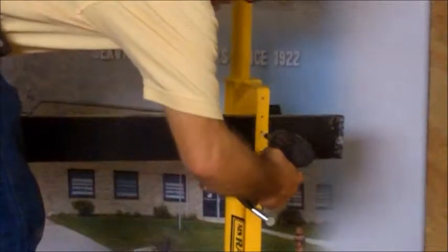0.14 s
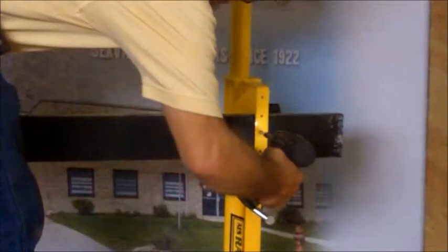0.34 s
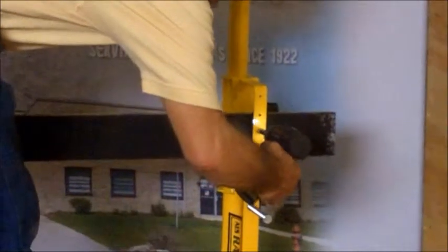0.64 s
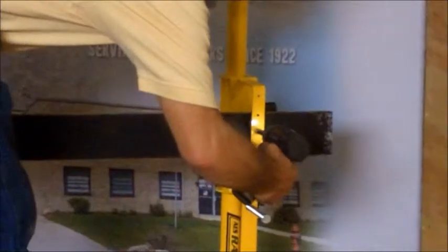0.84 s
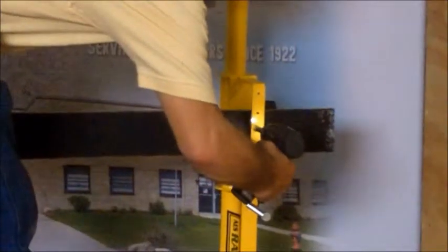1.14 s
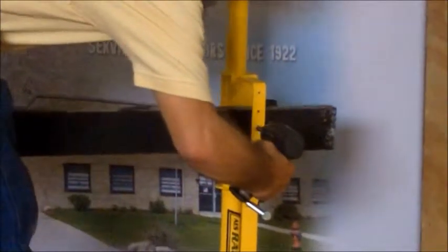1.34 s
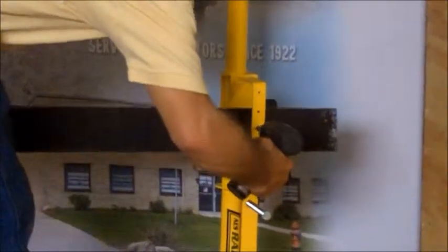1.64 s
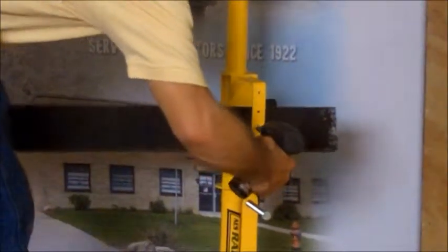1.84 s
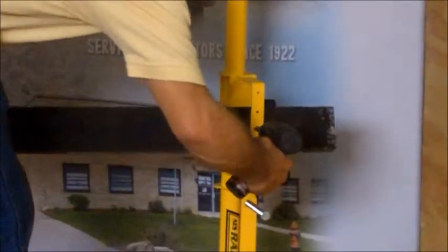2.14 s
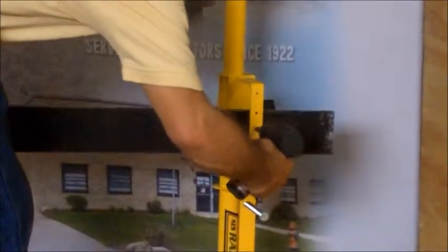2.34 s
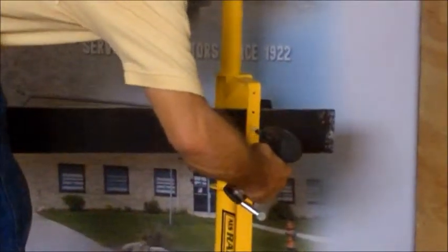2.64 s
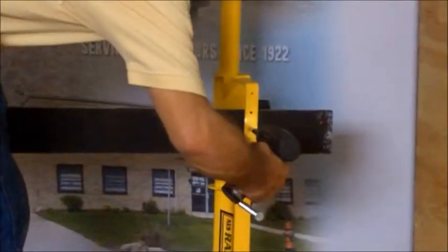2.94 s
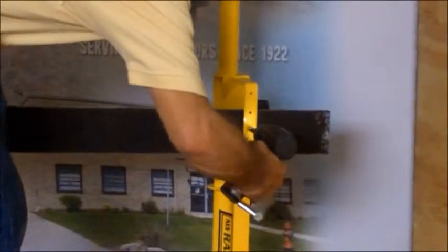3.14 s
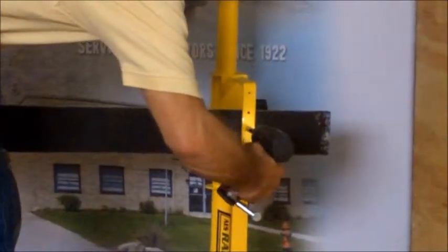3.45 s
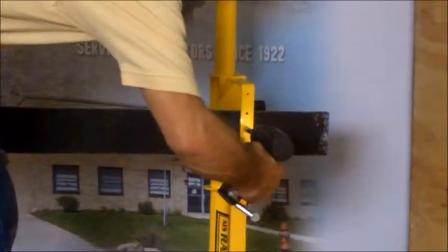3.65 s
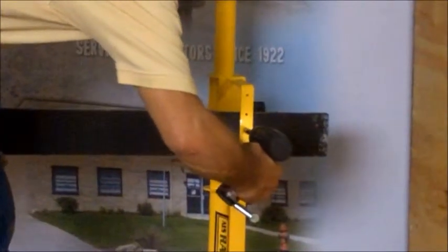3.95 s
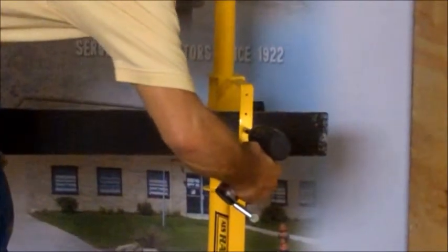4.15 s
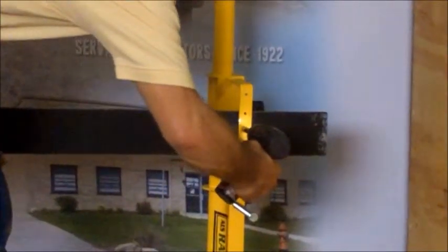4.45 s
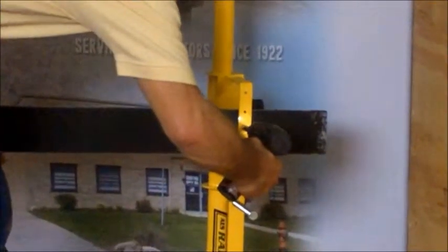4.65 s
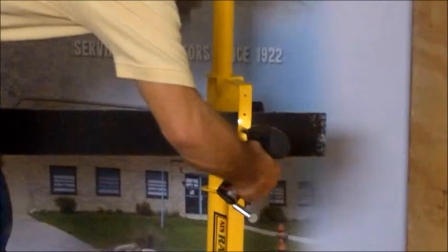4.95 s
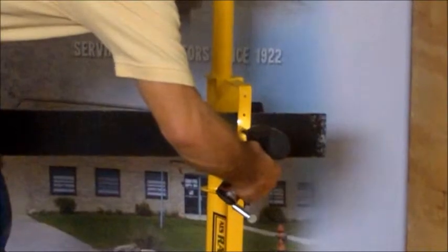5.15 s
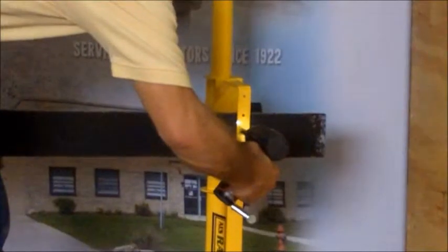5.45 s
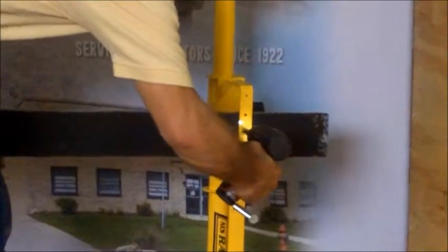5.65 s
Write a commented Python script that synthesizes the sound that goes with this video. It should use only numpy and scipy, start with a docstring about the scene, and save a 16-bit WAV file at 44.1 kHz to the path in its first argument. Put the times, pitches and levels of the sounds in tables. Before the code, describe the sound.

A cordless impact driver works close by in a workshop with a low hush and a short echo. At about 0.4 seconds its motor whirs up to a steady whine, and at 0.6 the bit clacks sharply several times as it seats. The screw groans faintly in the wood around 0.9 seconds. At 1.4 the motor coasts down. Until about 3 seconds, a steel post shifts against a rail and a large board, with soft knocks, scrapes and two short creaks. At 3 seconds the motor spins up again, then sags under load. At 3.3 a metallic clank opens loud, rapid hammering, quickening to about forty blows a second. The blows make the post ring and the board thud lightly. The ringing eases a little while the sharp clicks stand out more, continuing to the end near 5.8 seconds.

```python
"""A cordless impact driver fixes a steel post to a rail on a large board, close by in a workshop.
First the motor whirs up and runs a screw in: the bit clacks as it seats, the screw groans in the wood.
The motor coasts to a stop at 1.4 s, and the post shifts, knocking and scraping on the rail and board.
At 3 s a second pull begins: the motor sags under load and the hammer starts. To the end,
its blows, quickening to about forty a second, click sharply and make the post ring."""
import sys
import numpy as np
from scipy import signal
from scipy.fft import rfft, irfft
from scipy.io import wavfile
from scipy.ndimage import uniform_filter1d

SR = 44100
rng = np.random.default_rng(int(sys.argv[2]) if len(sys.argv) > 2 else 0)


def dump(signal):
    """Clip the signal to [-1, 1] and save it as 16-bit WAV at the path in sys.argv[1]."""
    limited = np.clip(np.atleast_2d(signal).T, -1, 1)
    pcm = np.round(limited * 32767).astype(np.int16)
    wavfile.write(sys.argv[1], SR, pcm)


N = 255383
T = np.arange(N) / SR
HZ = np.fft.rfftfreq(8192, 1 / SR)


def amp(db):
    return 10 ** (np.asarray(db) / 20)


def unit_rms(x):
    return x / np.sqrt(np.mean(x ** 2) + 1e-20)


def noise():
    return rng.standard_normal(N)


def since(s):
    """Seconds gone by since s, zero before."""
    return np.maximum(T - s, 0)


def curve(rows):
    """Joins (time, value) points into a value for every sample."""
    return np.interp(T, *np.transpose(rows))


def spectrum(points, hz=HZ):
    """Joins (frequency, value) points on a log-frequency axis."""
    f, value = np.transpose(points)
    return np.interp(np.log(hz + 1), np.log(f + 1), value)


def wander(hz):
    """A random wobble of unit size, up to about hz."""
    f = np.fft.rfftfreq(N, 1 / SR)
    return unit_rms(irfft(rfft(noise()) / (1 + (f / hz) ** 4), N))


def ring(x, gain):
    """Filters x by a gain for each of HZ; white noise keeps its power."""
    cepstrum = irfft(np.log(np.maximum(gain / gain.max(), 1e-5)))
    fold = 1 + np.sign(len(HZ) - 1 - np.arange(len(cepstrum)))  # so nothing rings before it is hit
    response = irfft(np.exp(rfft(cepstrum * fold) - cepstrum[0]))[:len(HZ)]
    return signal.oaconvolve(x, response / np.linalg.norm(response))[:N]


def tint(x, colour):
    return ring(x, amp(spectrum(colour)))


def body(x, modes, low_hz, high_hz):
    """An object rings at its modes (its own notes), only weakly under low_hz and over high_hz."""
    power = sum(amp(db) ** 2 / (1 + (2 * (HZ - hz) / width) ** 2) for hz, width, db in modes)
    low_cut = 1 + (low_hz / (HZ + 1)) ** 16
    high_cut = 1 + (HZ / high_hz) ** 6
    return ring(x, np.sqrt(power / low_cut / high_cut))


# Sound from all sides. Each row: frequency in Hz, how alike left and right are (1 is the same).
LIKENESS = [(30, 0.66), (200, 1), (1000, 1), (2500, 0.89), (5000, 0.31), (9000, 0.18), (14000, 0.13)]
def diffuse(a, b):
    """Blends two unrelated sounds into a left and right that differ most in the treble."""
    same = spectrum(LIKENESS, np.fft.rfftfreq(len(a), 1 / SR))
    mid = rfft(a) * np.sqrt((1 + same) / 2)
    side = rfft(b) * np.sqrt((1 - same) / 2)
    return irfft(np.array([mid + side, mid - side]), len(a))


# The tone of the workshop's air. Each row: frequency in Hz, relative level in dB.
AIR_COLOUR = [(20, -1), (50, 7), (70, 8), (120, 2), (200, -5.5), (300, -1.5), (450, -6), (640, -5.5),
              (750, -4.5), (1150, -8.5), (1330, -6), (1500, -7.5), (1660, -8), (2300, -15.5), (5000, -18.5),
              (15500, -26)]
def air(db=-57.5):
    """A steady, low hush from all around."""
    return amp(db) * diffuse(tint(noise(), AIR_COLOUR), tint(noise(), AIR_COLOUR))


# The board's notes. Each row: pitch in Hz, width in Hz (narrow rings longer), relative level in dB.
BOARD_MODES = [(76, 30, -9.5), (147, 7.3, 3), (155.4, 26, -1), (216, 21, 4), (258.4, 38, 1), (342, 41, 0.5),
               (364, 50, 2.5), (471, 34, 0.5), (485, 72, -3)]
def board(x):
    """The large board booms when shaken."""
    return body(x, BOARD_MODES, low_hz=38, high_hz=450)


# The post's notes. Each row: pitch in Hz, width in Hz, relative level in dB.
POST_MODES = [(721.2, 25.4, -1), (787, 44, -7.5), (853, 52, -8.5), (984, 36, -2.5), (1072, 13, -3.5),
              (1211, 55, -3), (1273, 41, -5), (1551, 44, -3.5), (1610, 60, 1.5), (1733, 31, -7.5),
              (1921, 62, -4), (2027, 9.3, -6), (2326, 17, -12), (2190, 57, -42), (3210, 99, -20),
              (3868, 4.9, -17.5), (4930, 62, -47), (5100, 70, -29), (5160, 160, -21.5), (6250, 46, -20)]
def post(x):
    """The steel post and its bracket ring when hit or rubbed."""
    return body(x, POST_MODES, low_hz=658, high_hz=9700)


# The rail's notes. Each row: pitch in Hz, width in Hz, relative level in dB.
RAIL_MODES = [(430, 27, -6.5), (543, 140, -1.5), (731, 27, 10.5), (830, 64, -1), (1158, 29, 10.5),
              (1356, 19, 7), (1540, 660, -4.5), (3940, 3100, -13), (7300, 730, -36)]
def rail(x):
    """The rail rings when rubbed."""
    return body(x, RAIL_MODES, low_hz=278, high_hz=9500)


# The post shifts on rail and board. Each row: time of full strength, rise and hold in seconds,
# then relative levels of scrape and boom in dB.
POST_SHIFTS = [(0.265, 0.06, .02, -75, -56.5), (0.874, 0.062, 0.2, -48, -40.5),
               (1.367, 0.028, .04, -41, -35.5), (1.788, 0.024, 0.053, -53.5, -42.5),
               (2.109, 0.076, 0.058, -53, -72), (2.274, 0.051, .015, -63, -48),
               (2.385, 0.048, 0.011, -55, -45), (2.54, 0.047, 0.093, -43, -36.5),
               (3.082, .03, .04, -44, -39.5)]
def friction(scrape_fade_s=0.015, boom_fade_s=0.065, uneven_db=2.5, rumble_fade_db_per_s=7):
    """Uneven slips of post and screw ring the steel and the rail and make the board rumble."""
    scrape_power, shake_power = np.zeros((2, N))
    for s, rise, hold, scrape_db, boom_db in POST_SHIFTS:
        attack = np.minimum(since(s - rise) / rise, 1)
        after = since(s + hold)
        scrape_power += (amp(scrape_db) * attack * np.exp(-after / scrape_fade_s)) ** 2
        shake_power += (amp(boom_db) * attack * np.exp(-after / boom_fade_s)) ** 2
    # the turning screw shakes the board, less as it tightens
    fade_db = rumble_fade_db_per_s * since(FIRST_BLOW_S)
    for _, full, release, *_, rumble_db, _ in TRIGGER_PULLS:
        shake_power += (amp(rumble_db - fade_db) * running(full, release)) ** 2
    slips = unit_rms(amp(uneven_db * wander(75)))
    rub = np.sqrt(scrape_power) * slips
    scrape = rail(rub * noise())
    rumble = board(amp(-3.5) * np.sqrt(shake_power) * slips * noise())
    return amp(-7) * post(rub * noise()) + scrape + rumble


# The notes of the loose bit and screw. Each row: pitch in Hz, width in Hz, relative level in dB.
BIT_MODES = [(694, 170, 3), (1090, 180, 3), (1680, 490, -5), (2320, 97, 1), (2980, 440, 0),
             (3810, 510, -3.5), (4840, 840, -3.5), (6160, 600, -18), (8000, 2500, -14)]
# Single knocks. Each row: start in seconds, levels of bit, post and board in dB, fade in seconds.
KNOCK_EVENTS = [(0.342, -48.5, -76, -77.5, 0.0022), (0.578, -27.5, -51, -52, 0.015),
                (0.5857, -16.5, -46, -31, 0.0036), (0.5982, -20.5, -33, -34, 0.0013),
                (0.6135, -23, -49, -28.5, 0.002), (0.622, -24.5, -46, -27, 0.0012),
                (0.627, -25.5, -35, -45, 0.0021), (1.783, -55, -50, -44, 0.023),
                (2.854, -62, -60, -54, 0.012), (3.326, -40, -21.5, -54, 0.022),
                (3.641, -46, -34, -39, 0.0019)]
def knocks(edge_db=6):
    """Single knocks: the bit jumps, the post bumps the board, or the hammer slips or strikes once."""
    clack, ringing, boom = np.zeros((3, N))
    for s, bit_db, post_db, board_db, fade in KNOCK_EVENTS:
        burst = (T >= s) * np.exp(-since(s) / fade) * noise()
        burst[round(s * SR)] += amp(edge_db)  # a hard edge starts the short rattle
        clack += amp(bit_db) * burst
        ringing += amp(post_db) * burst
        boom += amp(board_db) * burst
    return body(clack, BIT_MODES, low_hz=457, high_hz=10100) + post(ringing) + board(boom)


def running(start, release, swell_s=0.13, cut_s=0.0067, coast_db=-7):
    """The driver's loudness over one pull: it swells, holds, drops at the release and coasts out."""
    swell = np.minimum(since(start) / swell_s, 1)
    cut = np.exp(-since(release) / cut_s)
    coast = amp(coast_db) * np.exp(-since(release) / COAST_S)
    return swell * np.maximum(cut, coast)


COAST_S = .11  # how slowly the rotor runs down
# Trigger pulls. Each row: times of squeeze, full power and release, and spin-up time, in seconds;
# free-running whine in Hz; relative levels of whirr and board rumble in dB; speed wobble as a fraction.
TRIGGER_PULLS = [(0.422, 0.478, 1.4, .074, 1042, -42, -41.5, 0.01),
                 (2.974, 3.011, 6.0, .058, 997.8, -40, -41.5, 0.01)]
def rotor(creep_hz=260.2, sag_s=.09, whine_cycles_per_blow=24, hammer_wobble=.03, fade_db_per_s=2.04):
    """The rotor creeps, spins up, then coasts or sags. Gives whine pitch, speed wobble and loudness."""
    hz, wobble, gain = np.zeros((3, N))
    for squeeze, full, release, spin_up, free_hz, whirr_db, _, free_wobble in TRIGGER_PULLS:
        spin_hz = np.maximum(free_hz * (1 - np.exp(-since(full) / spin_up)), creep_hz)
        hz = np.where(T >= squeeze, spin_hz * np.exp(-since(release) / COAST_S), hz)
        wobble = np.where(T >= squeeze, free_wobble, wobble)
        gain += amp(whirr_db) * running(squeeze, release)
    # the biting screw drags the speed down to the hammer's pace; the blows then jerk it
    load = np.minimum(since(FIRST_BLOW_S - sag_s) / sag_s, 1) ** 2
    hz += load * (whine_cycles_per_blow * curve(BLOW_PACE) - hz)
    wobble = np.where(T >= FIRST_BLOW_S, hammer_wobble, wobble)
    return hz, wobble, gain * amp(-fade_db_per_s * since(FIRST_BLOW_S))


# Higher gear tones. Each row: multiple of the whine's pitch, relative level in dB.
GEAR_OVERTONES = [(2, -18), (3, -9.5), (4, -11), (5, -10), (6, -19.5), (7, -24), (8, -37)]
# The tone of the fan and of the scraping brushes. Each row: frequency in Hz, relative level in dB.
FAN_RUSH = [(200, -17.5), (550, -2), (800, -1), (1050, -0.5), (1400, -3.5), (2000, -10), (2600, -10),
            (3100, -3.5), (3550, -6), (4050, -5), (5200, -6), (5800, -8), (7500, -14), (9500, -22.5),
            (12000, -19.5), (15500, -34)]
BRUSH_SCRAPE = [(300, -24), (800, 6), (1100, 2), (1800, -5.5), (2900, -0.5), (4200, -1), (5300, -4.5),
                (6500, -13.5), (12000, -30)]
# The lowest gear tone, strong while the bit presses it into the post.
# Each row: time in seconds, relative level in dB.
WHINE_LEVEL = [(0.7, -46), (0.8, -53), (1.4, -46.5), (3.14, -44.5), (3.2, -33), (3.31, -22.5),
               (3.35, -35.5), (5.79, -44)]
def motor(flutter=0.607, rough=0.62, throb=0.59, full_speed_hz=850):
    """Gears, fan and brushes on one shaft. Gives the lowest gear tone (whine) and the rest (whirr)."""
    hz, wobble, gain = rotor()
    uneven_hz = hz * (1 + wobble * (wander(40.5) + flutter * wander(200)))
    phase = 2 * np.pi * np.cumsum(uneven_hz) / SR
    speed = np.minimum(hz / full_speed_hz, 1)
    gears = sum(amp(db) * np.sin(k * phase) * (1 + rough * wander(38)) for k, db in GEAR_OVERTONES)
    gears *= np.sqrt(2) * speed ** 4  # slow teeth meet softly
    fan = tint(noise() * (1 + throb * np.sin(phase / 3)), FAN_RUSH)
    brushes = tint(noise(), BRUSH_SCRAPE)
    fan_share = speed ** 3  # air takes over from the brushes as the speed rises
    hiss = np.sqrt(fan_share) * fan + np.sqrt(1 - fan_share) * brushes
    powered = sum(running(squeeze, release) for squeeze, _, release, *_ in TRIGGER_PULLS)
    whine = np.sqrt(2 * fan_share) * powered * amp(curve(WHINE_LEVEL)) * np.sin(phase)
    whirr = gain * (amp(-2) * hiss + amp(-1) * gears)
    return whine, whirr


# Short low groans: the screw turning in the wood, then the post shifting.
# Each row: start and length in seconds, first and last pitch in Hz, level in dB.
GROAN_EVENTS = [(0.788, 0.28, 228, 200.6, -40), (1.777, 0.13, 290, 293, -43),
                (2.505, .23, 489.3, 335, -42.5)]
def groans(jitter=0.0451, rough=0.52):
    """Quick, uneven slips merge into a short low tone that swells and fades."""
    out = np.zeros(N)
    for s, length, first_hz, last_hz, db in GROAN_EVENTS:
        progress = np.minimum(since(s) / length, 1)
        hz = (first_hz + (last_hz - first_hz) * progress) * (1 + jitter * wander(131))
        swell = np.sin(np.pi * progress ** 0.67) * (1 + rough * wander(50))
        out += amp(db) * swell * np.sin(2 * np.pi * np.cumsum(hz) / SR)
    return out


# The hammer gathers pace. Each row: time in seconds, blows per second.
BLOW_PACE = [(3.342, 33.61), (3.55, 36.766), (3.95, 38.268), (4.4, 39.351), (5.0, 40.128), (5.79, 40.854)]
FIRST_BLOW_S = BLOW_PACE[0][0]
# How hard the hammer hits. Each row: time in seconds, relative level in dB.
BLOW_FORCE = [(3.342, -9.5), (3.4, -15), (3.487, -20), (3.55, -14), (3.68, -17.5), (4.25, -18), (4.5, -20),
              (5.0, -20), (5.79, -24)]
def hammer_blows(lug_db=0.24, force_spread_db=1.84, timing_spread_s=.0003):
    """Two unequal lugs (the hammer's teeth) strike in turn. Gives each blow's time and level in dB."""
    under_load = T >= FIRST_BLOW_S
    blows_so_far = np.cumsum(curve(BLOW_PACE)[under_load]) / SR
    count = np.arange(int(blows_so_far[-1]) + 1)
    late, hard = rng.standard_normal((len(count), 2)).T
    times = np.interp(count, blows_so_far, T[under_load]) + timing_spread_s * late
    db = np.interp(times, *np.transpose(BLOW_FORCE))
    return times, db + lug_db * (-1) ** count + force_spread_db * hard


def strikes(times, db, shape=(1.0,)):
    """Lays down the same shape at each time, at its own level."""
    train = np.zeros(N)
    np.add.at(train, np.clip(np.round(times * SR).astype(int), 0, N - 1), amp(db))
    return signal.oaconvolve(train, shape)[:N]


def chatter(rise_s, hold_s, fade_s):
    """The loudness of steel faces rattling together, then letting go."""
    t = T[:SR // 20]
    return (1 - np.exp(-t / rise_s)) * np.exp(-np.maximum(t - hold_s, 0) / fade_s)


def hammer(times, db, rebound_s=0.002993, cam_s=0.015):
    """Each blow pushes the anvil, rebounds and chatters: the post rings and the board thuds."""
    bounce, late, size = rng.standard_normal((len(times), 3)).T
    push = strikes(times, db)
    rebound = strikes(times + rebound_s * (1 + 0.064 * bounce), db)
    rattle = noise() * strikes(times, db, chatter(rise_s=0.0019, hold_s=0.0057, fade_s=0.004))
    # between blows the hammer rides up its cam (a ramp) and slips off with a small knock
    cam = strikes(times + cam_s * (1 + 0.1003 * late), db + 5 + 4 * size)
    ringing = post(amp(15) * push + amp(20) * rebound + amp(-1) * rattle + cam)
    thud = body(amp(-23) * rattle + amp(2) * push, BOARD_MODES, low_hz=147, high_hz=624)
    return ringing + thud


# The click gains on the ring as the screw tightens. Each row: time in seconds, dB added to the blow.
CLICK_LEVEL = [(3.34, -14.5), (3.48, -9), (3.6, -15.5), (3.9, -11.5), (4.25, -14), (4.6, -9), (4.9, -8.5),
               (5.3, -6), (5.79, -5)]
# The tone of the click. Each row: frequency in Hz, relative level in dB.
CLICK_TONE = [(1200, -9.5), (2300, 4), (2800, -12), (3500, -7.5), (4400, -2), (5300, -3), (6500, -8),
              (8300, -10.5), (9200, -16), (11500, -15.5), (13000, -23), (15500, -37)]
def clicks(times, db, evenness=0.21, snap_db=-3, flicker_db=1.0):
    """Steel clicks at each blow, more evenly than the post rings; first contact is the brightest."""
    even_db = db + evenness * (uniform_filter1d(db, size=9) - db)
    click_db = even_db + np.interp(times, *np.transpose(CLICK_LEVEL))
    click = noise() * strikes(times, click_db, chatter(0.00016, 0.0046, fade_s=0.0061))
    snap = noise() * strikes(times, click_db + snap_db, chatter(0.00018, 0.0048, fade_s=0.00051))
    bright_snap = np.diff(snap, prepend=0)
    return tint((click + bright_snap) * amp(flicker_db * wander(1050)), CLICK_TONE)


# Short waves scatter most. Each row: frequency in Hz, relative level in dB.
SCATTER_TONE = [(1000, -4), (5000, 1), (9000, 0.5), (14000, 4)]
def scattered_clicks(times, db):
    """The clicks glance off board and post and arrive from all sides."""
    return diffuse(tint(clicks(times, db), SCATTER_TONE), tint(clicks(times, db), SCATTER_TONE))


# The workshop's echo. Each row: frequency in Hz, seconds it takes to fade by 60 dB.
ECHO_TIMES = [(150, 0.066), (500, 0.35), (2000, 0.51), (5000, 0.23), (12000, 0.34)]
def room_echo(x, gap_s=0.0088, density=.1):
    """Dense reflections follow a short gap, each band dying at its own speed."""
    signs = rng.choice([-1., 1.], (2, SR))
    reflections = signs * (rng.random((2, SR)) < density) * (T[:SR] > gap_s)
    hz, t, bands = signal.stft(reflections, SR, nperseg=256)
    fade = amp(-60 * t / spectrum(ECHO_TIMES, hz)[:, None])
    _, tails = signal.istft(bands * fade, SR)
    tails /= np.linalg.norm(tails, axis=1, keepdims=True)
    return signal.fftconvolve(x[None], diffuse(*tails), axes=1)[:, :N]


def from_right(x, lag_samples=0.92):
    """The work lies a little to the right, so its sound reaches the left side later."""
    half_delay = np.exp(-1j * np.pi * np.fft.rfftfreq(N) * lag_samples)
    return irfft(rfft(x) * np.array([half_delay, 1 / half_delay]), N)


def scene():
    """Driver and workpiece heard directly, their echo in the workshop, and its steady air."""
    whine, whirr = motor()
    times, db = hammer_blows()
    blows = amp(-1) * (hammer(times, db) + clicks(times, db))
    scatter = amp(-5) * scattered_clicks(times, db)
    work = knocks() + friction() + groans()
    hush = air()
    echo = room_echo(amp(-11) * blows + amp(-3) * whirr + amp(-8) * work + amp(-18) * whine)
    return from_right(blows + whirr + work + whine) + scatter + echo + hush


def record(dry, ceiling=.54, top_hz=15600, offset=.0029):
    """Rounds off the loudest blows, cuts the highest treble and adds a tiny constant offset."""
    rounded = dry / (1 + (dry / ceiling) ** 6) ** (1 / 6)
    lowpass = signal.firwin(511, top_hz, window=("kaiser", 9), fs=SR)
    return offset + signal.oaconvolve(rounded, lowpass[None], "same")


dry = scene()
out = record(dry)
dump(out)
```